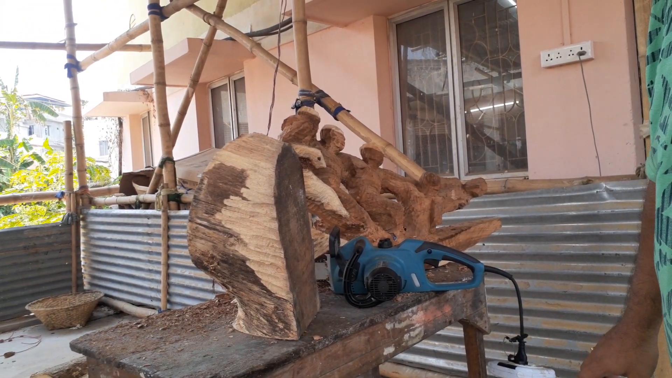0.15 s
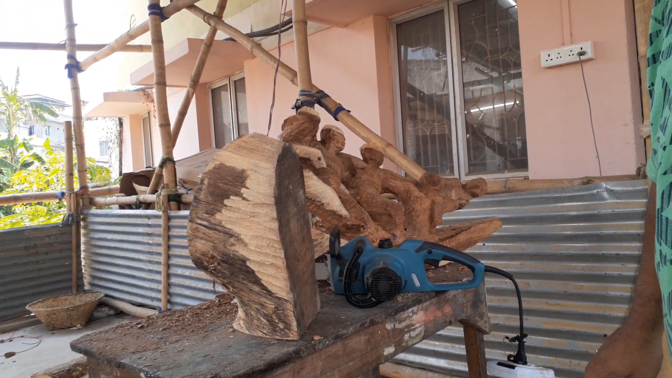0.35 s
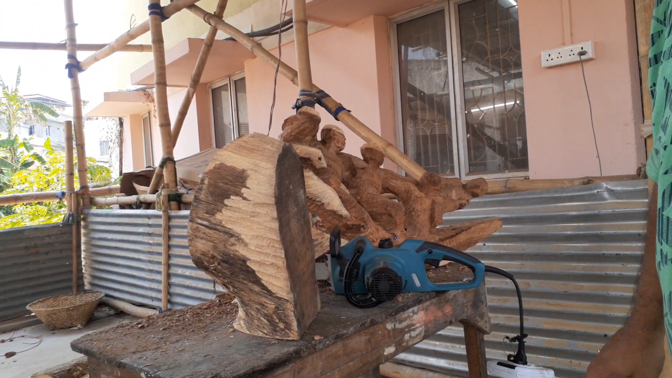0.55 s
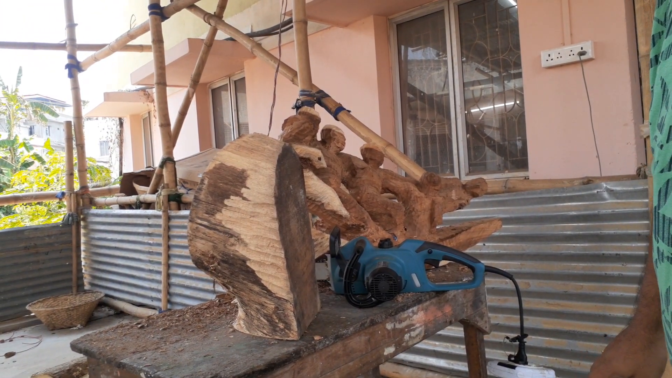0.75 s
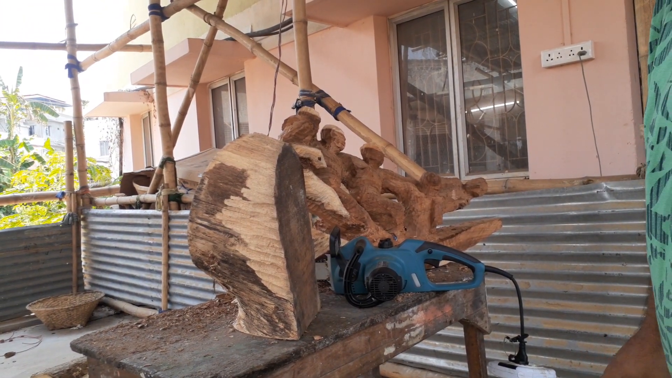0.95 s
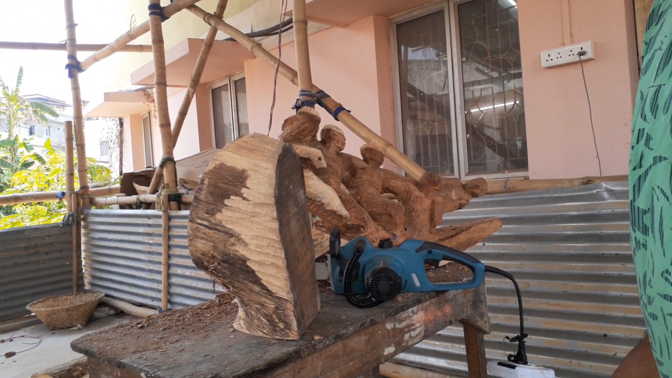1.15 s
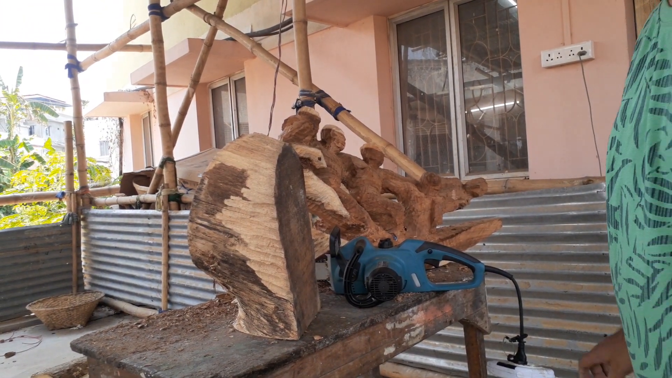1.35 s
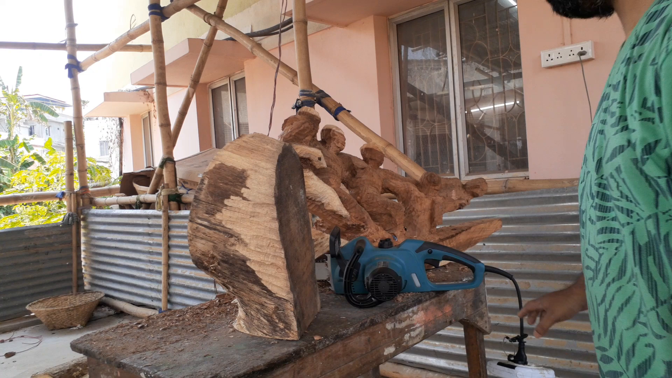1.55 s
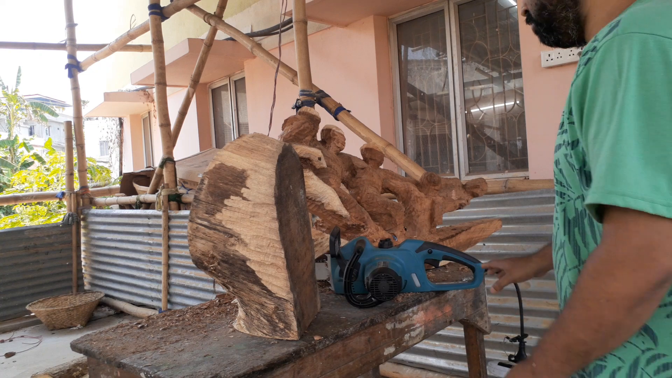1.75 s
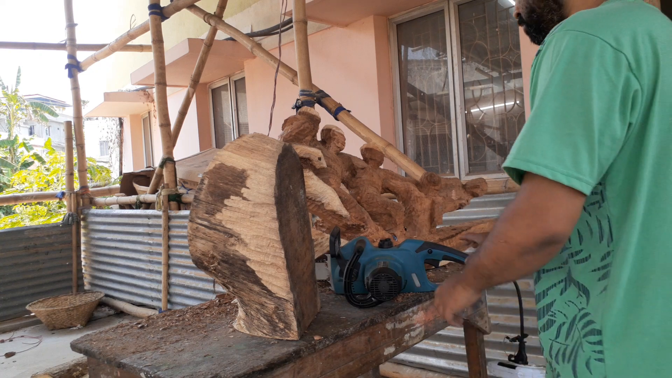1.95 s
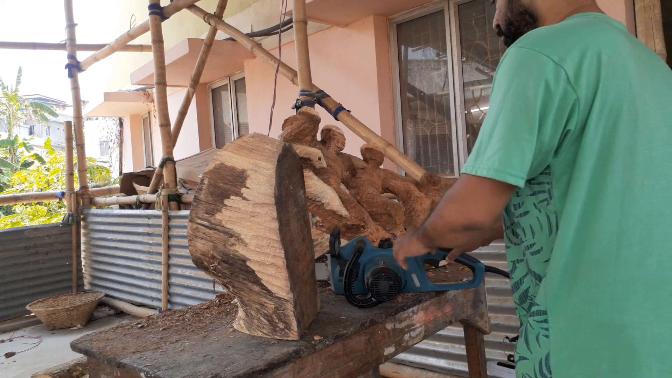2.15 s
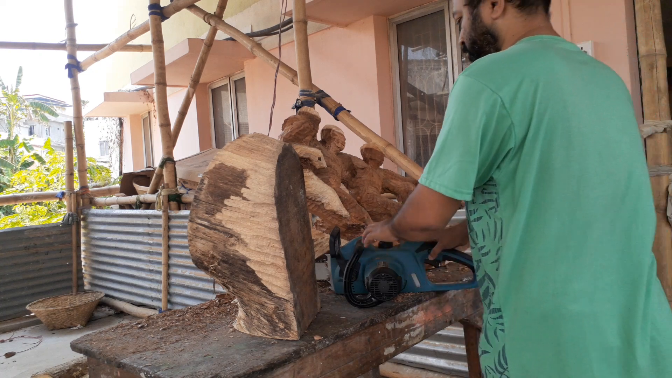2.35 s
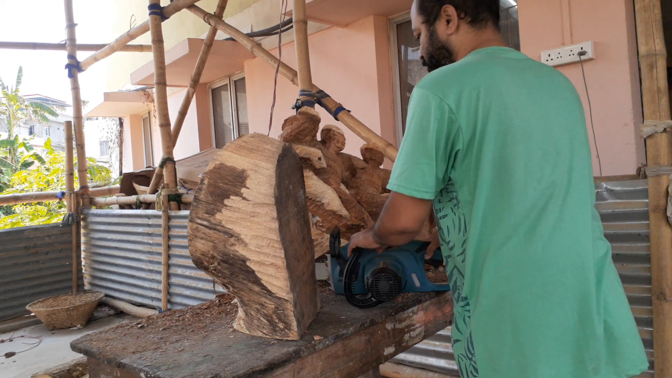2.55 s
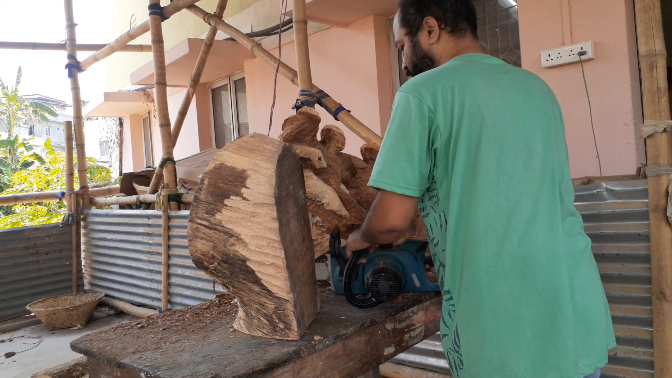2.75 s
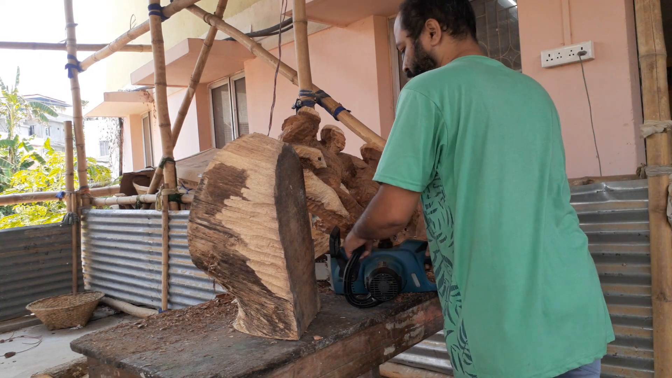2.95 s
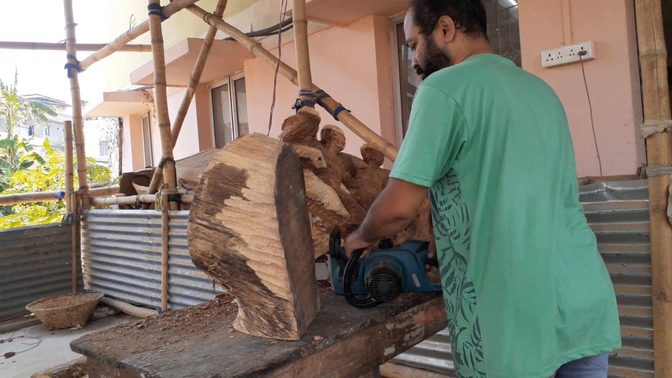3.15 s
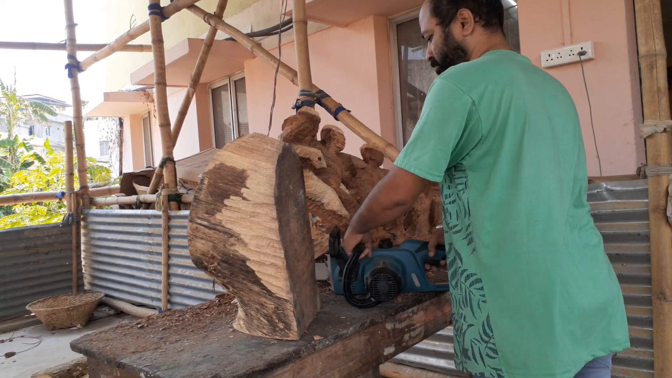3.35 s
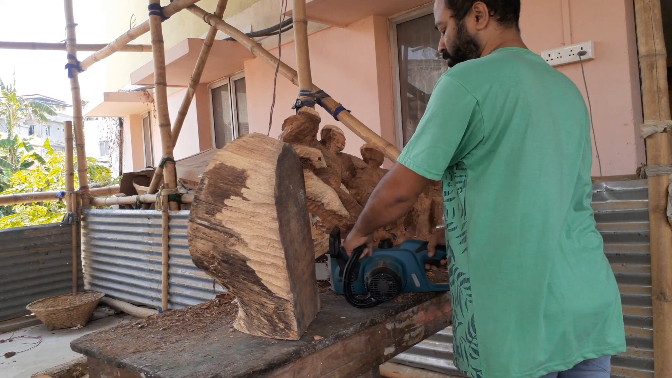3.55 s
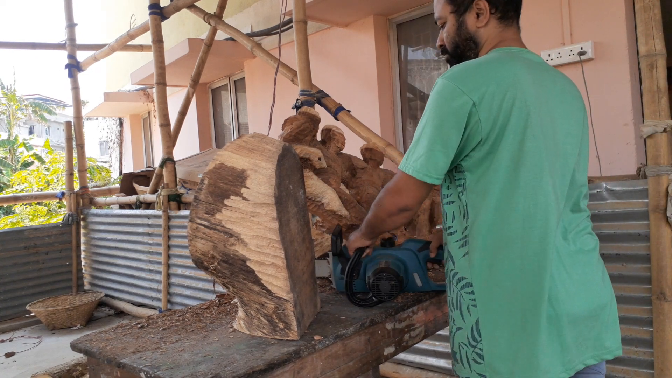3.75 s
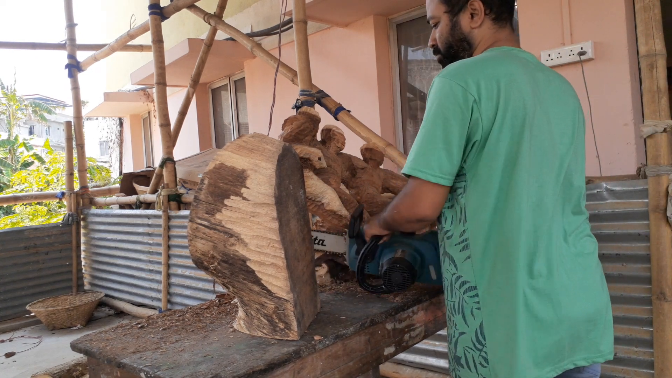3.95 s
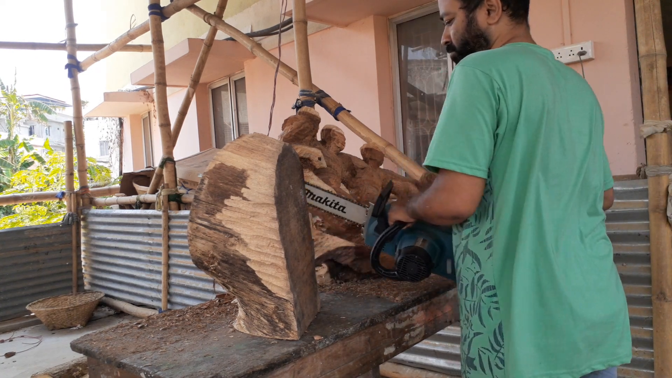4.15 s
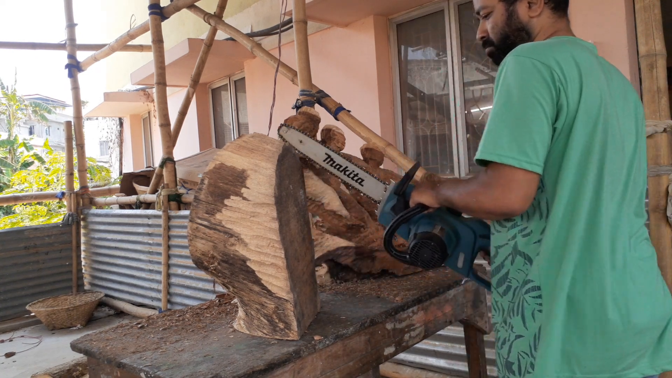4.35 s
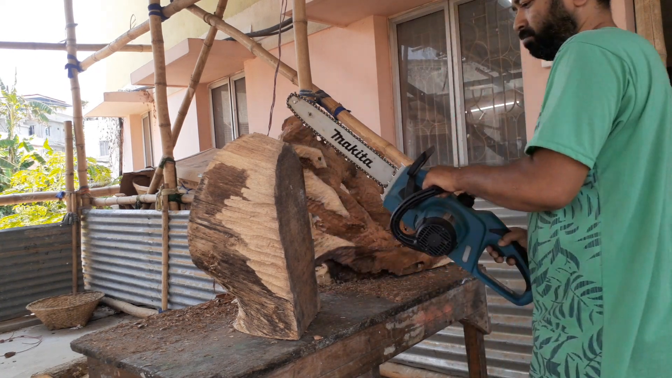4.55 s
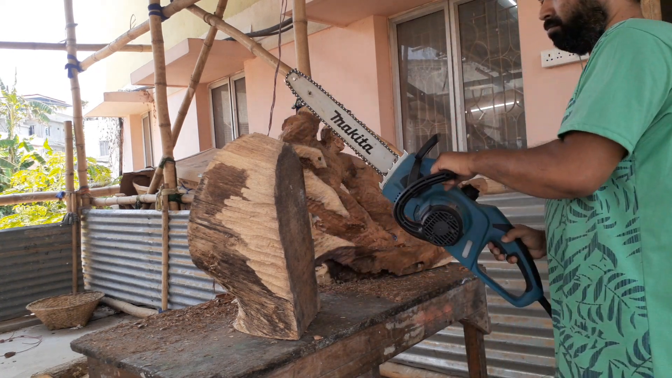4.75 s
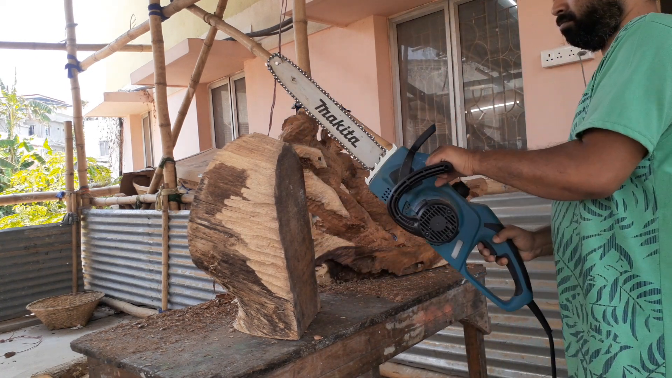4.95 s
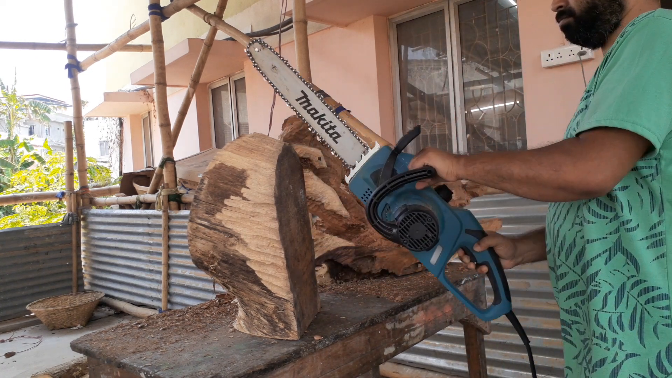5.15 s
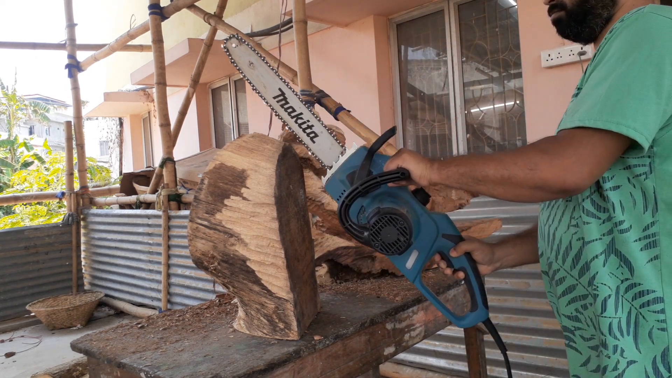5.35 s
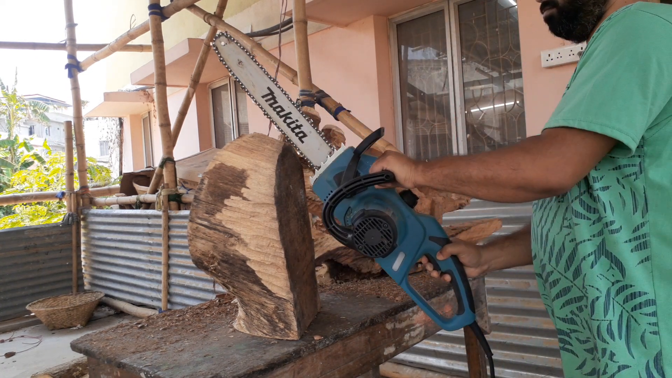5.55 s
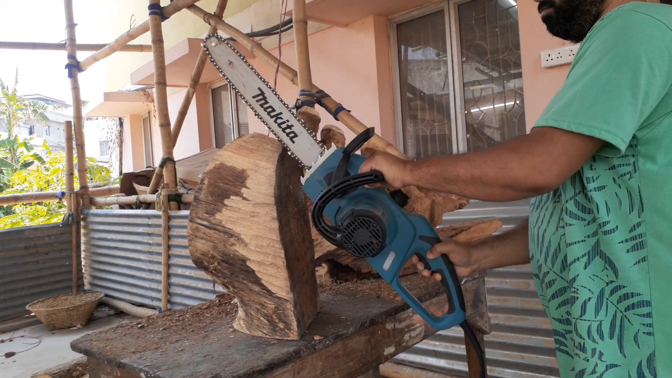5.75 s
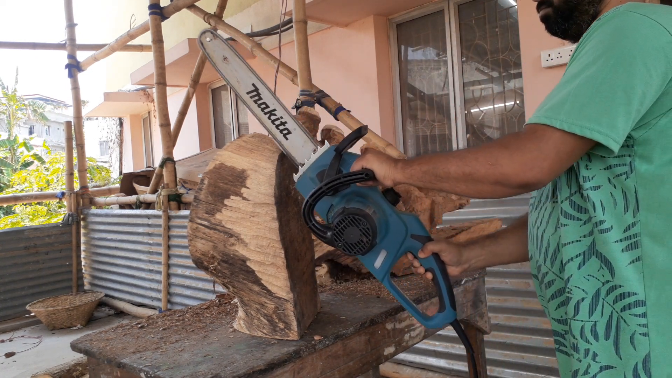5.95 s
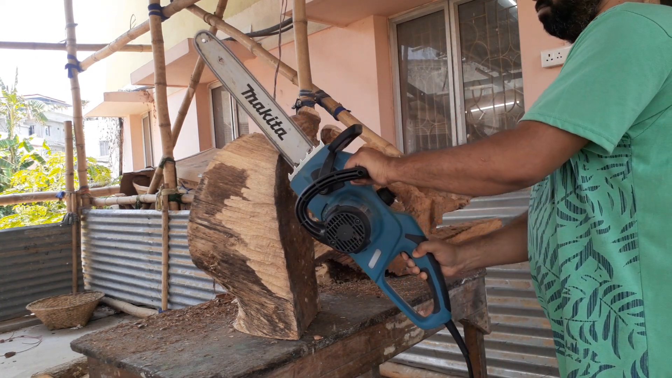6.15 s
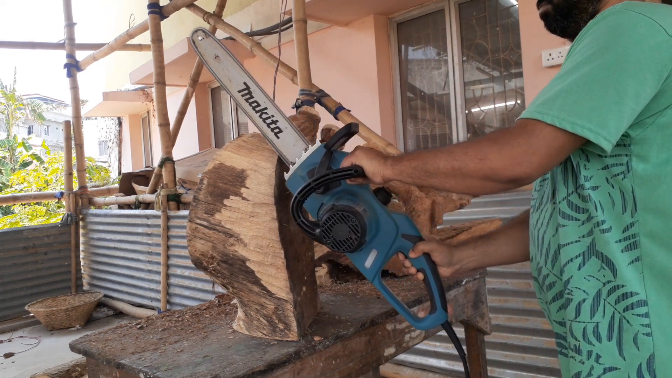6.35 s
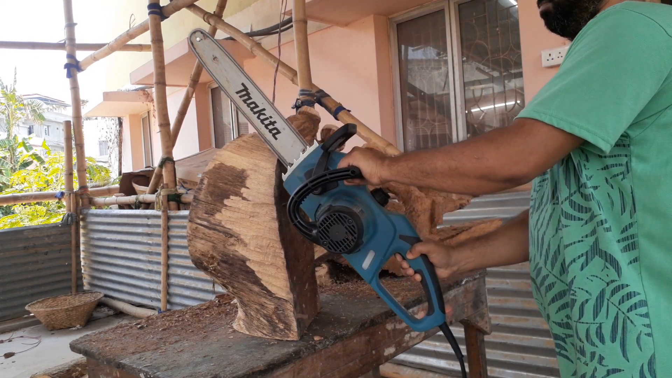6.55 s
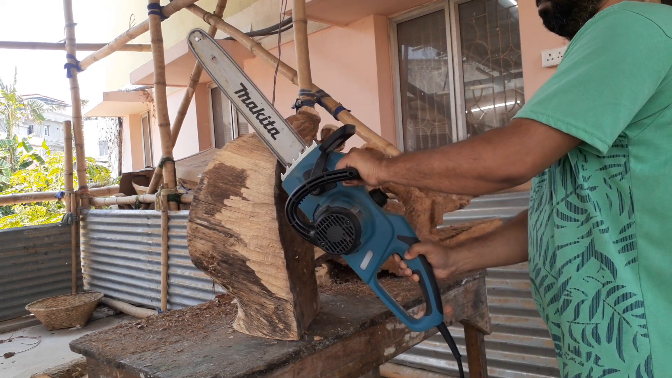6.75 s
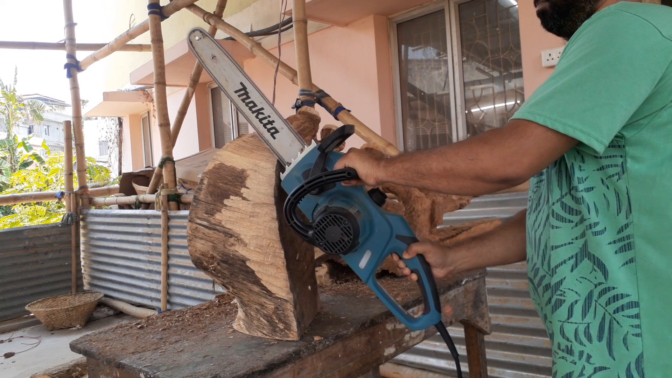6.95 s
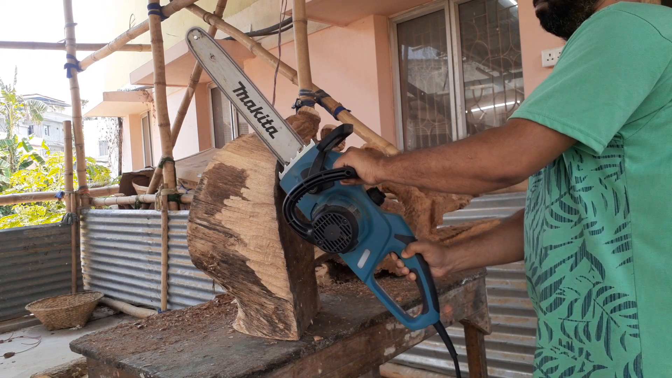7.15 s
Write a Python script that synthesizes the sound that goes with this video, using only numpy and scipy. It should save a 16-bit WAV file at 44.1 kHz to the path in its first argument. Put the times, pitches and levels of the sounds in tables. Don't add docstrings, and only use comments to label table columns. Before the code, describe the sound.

Stereo camera microphone in a quiet work yard: irregular woody-metallic chisel taps ring from a distance over soft hum and rumble. Nearby come a gritty footstep, a sharp knock, cloth rubs and light clicks. After almost six seconds a loud electric saw starts with a clattering kick, its gear whine climbing quickly to a steady high pitch amid rattling chain and airy fan noise; the automatic gain pulls down the background.

```python
import sys
import numpy as np
from scipy import signal
from scipy.fft import rfft, irfft, next_fast_len
from scipy.io import wavfile
from scipy.ndimage import map_coordinates

SR = 44100
rng = np.random.default_rng(int(sys.argv[2]) if len(sys.argv) > 2 else 0)


def wav_out(sig):
    wavfile.write(sys.argv[1], SR, np.round(np.clip(np.atleast_2d(sig).T, -1, 1) * 32767).astype(np.int16))


def level_to_linear(level):
    exponent = np.asarray(level, float) / 20
    return 10 ** exponent


N = 317961
SWITCH_ON_S = 5.9365
YARD_LAG = 14.12
# pitch_hz, likeness (1 = the same)
YARD_LIKENESS = [(60, .91), (300, .86), (1000, .7), (3000, .62), (8000, .3)]


def unit(x):
    return x / np.sqrt(np.mean(x ** 2) + 1e-20)


def along(points, hz):
    f, v = np.transpose(points)
    return np.interp(np.log(hz + 1), np.log(f + 1), v)


def curves(rows):
    s, *cols = np.transpose(rows)
    return [np.interp(np.arange(N) / SR, s, c) for c in cols]


def wobble(rate):
    at = np.arange(0, N + 32, 32)
    knots = rng.standard_normal(int(N * rate / SR) + 5)
    return np.interp(np.arange(N), at, map_coordinates(knots, [at * rate / SR]))


def filtered(x, response):
    n = x.shape[-1]
    m = next_fast_len(n + 8192)
    return irfft(rfft(x, m) * response(np.fft.rfftfreq(m, 1 / SR)), m)[..., :n]


def ports(lag, balance=((100, 0), (1000, 0))):
    side = np.array([[.5], [-.5]])
    return lambda hz: level_to_linear(side * along(balance, hz)) * np.exp(-2j * np.pi * hz * side * lag / SR)


def rush(spectrum, alike, heard, count=N):
    m = next_fast_len(count)
    hz = np.fft.rfftfreq(m, 1 / SR)
    turn = np.arccos(np.clip(along(alike, hz), -1, 1)) / 2
    coloured = rfft(rng.standard_normal((2, m))) * level_to_linear(along(spectrum, hz))
    mid, side = coloured * [np.cos(turn), np.sin(turn)]
    return unit(irfft(heard(hz) * [mid + side, mid - side], m)[:, :count])


def yard_noise(spectrum, count=N):
    return rush(spectrum, YARD_LIKENESS, ports(YARD_LAG), count)


def add(track, s, sound):
    part = track[:, round(s * SR):][:, :sound.shape[1]]
    part += sound[:, :part.shape[1]]


def strokes(rows):
    t = np.arange(0, N + 16, 16) / SR
    power = 0
    for s, hold, db, rise, fall in rows:
        before, after = np.maximum(s - t, 0), np.maximum(t - s - hold, 0)
        power = power + level_to_linear(db - rise * before - fall * after) ** 2
    return np.interp(np.arange(N) / SR, t, np.sqrt(power))


def yard():
    # pitch_hz, start_level_db, end_level_db
    pump = [(62, -56, -56), (123.5, -55, -56), (199.5, -55, -52), (280, -62, -60), (302, -60, -52),
            (326.3, -53, -48), (349.9, -46, -47.5), (373.5, -59, -59), (443, -57, -58)]
    # pitch_hz, density_db (per Hz)
    rumble_colour = [(15, -56), (25, -33), (45, -7), (65, 7), (123, 5), (167, 0.5), (200, -2), (260, -38),
                     (340, -16), (570, -120)]
    air_colour = [(120, -16), (200, -15), (350, -7), (500, -12), (750, -13.5), (1100, -15.5), (1600, -13.5),
                  (2500, -22), (3500, -27.5), (4700, -27), (6000, -37.5), (8500, -40.5), (11000, -40.5),
                  (15800, -49)]
    # start_s, hold_s, level_db, rise_db_per_s, fall_db_per_s
    traffic = [
        (.22, .05, -55, 20, 45),
        (.69, .3, -54, 33, 20),
        (1.4, .05, -51, 40, 29),
        (3.02, 0.088, -49, 12, 12),
        (4.0, .35, -48.5, 12, 27),
        (4.84, .01, -52, 230, 140),
        (5.81, .02, -41, 60, 120),
    ]
    air_swells = [
        (.01, 0.11, -43.5, 50, 42),
        (1.4, .02, -39.5, 70, 34),
        (2.5, .6, -46, 30, 12),
        (4.38, 0.072, -45, 29.8, 30),
        (5.65, 0.028, -48, 40, 52),
    ]
    rumble_db, air_db = -49.5, -44.5
    t = np.arange(N) / SR
    hum = np.zeros(N)
    for hz, start_db, end_db in pump:
        level = level_to_linear(np.linspace(start_db, end_db, N) + 4 + 1.0 * wobble(3))
        hum += level * np.sin(2 * np.pi * (hz * t + .04 * wobble(3)))
    rumble_gain = np.hypot(level_to_linear(rumble_db), strokes(traffic)) * level_to_linear(0.28 * wobble(4.5))
    rumble = rumble_gain * yard_noise(rumble_colour)
    air_gain = np.hypot(level_to_linear(air_db), strokes(air_swells)) * level_to_linear(2 + .5 * wobble(8))
    air = air_gain * yard_noise(air_colour)
    leaning_left = level_to_linear([[.4], [-.4]])
    return leaning_left * (rumble + filtered(hum, ports(YARD_LAG))) + air


def scuffs():
    # pitch_hz, density_db (per Hz)
    chip_colour = [(180, -35), (300, -13), (425, -0.5), (546, -9), (885, -0.5), (1560, 1), (1690, 1.5),
                   (1840, -3), (3400, -11.5), (3830, -7), (4520, -10), (11900, -22.5), (16000, -28)]
    cloth_colour = [(880, -42), (1500, 0), (2230, -4), (2770, -9), (5380, -9.5), (7320, -16), (10800, -17),
                    (16000, -23)]
    # start_s, hold_s, level_db, rise_db_per_s, fall_db_per_s
    footstep = [
        (1.309, .01, -26, 3000, 300),
        (1.325, .023, -22, 900, 135),
        (1.436, .005, -25.5, 250, 150),
        (1.4, .1, -40, 900, 60),
    ]
    handling = [
        (.102, .005, -49, 400, 185),
        (.03, 0.29, -62, 300, 90),
        (2.27, 0.21, -52.5, 900, 90),
        (2.592, 0.045, -45, 110, 80),
        (2.794, .003, -42.5, 900, 400),
        (2.84, .17, -41.5, 500, 90),
        (3.028, 0.018, -48, 700, 148.4),
    ]
    bright_db, dulls_db_per_s, dullest_db = -5, 137, -25
    since_heel = np.arange(N) / SR - footstep[0][0]
    crackle_db = np.clip(bright_db - dulls_db_per_s * since_heel, dullest_db, bright_db)
    chips = yard_noise(chip_colour) * level_to_linear(1.1 * wobble(300))
    sliding = filtered(chips, lambda hz: 1 / (1 + (hz / 5000) ** 4))
    foot = strokes(footstep) * (unit(sliding) + level_to_linear(crackle_db) * unit(chips - sliding))
    cloth = yard_noise(cloth_colour) * level_to_linear(2.5 * wobble(700) + .7 * wobble(40))
    return foot + cloth * level_to_linear(2.5) * strokes(handling)


def ticks():
    # start_s, peak_db, centre_hz, left_minus_right_db, t60_s (time to fall 60 dB)
    clicks = [(.1, -52, 9000, 0, .1), (.36, -60, 9000, 0, .05), (1.54, -56, 9000, 3, .04),
              (1.74, -54, 9000, 0, .06), (2.276, -32, 1700, -2, .04), (2.278, -44, 5200, -2, .04),
              (2.3105, -23, 1620, 0, .06), (2.3, -55, 13000, 0, .04), (3.603, -41, 8000, 3, .02),
              (3.603, -35, 3800, 3, .02), (3.62, -52, 5000, 0, .04), (3.737, -51, 3200, 0, .04),
              (4.2, -59, 8000, 0, .06), (4.54, -57, 6500, 0, .04), (4.565, -54, 8000, 0, .04),
              (5.045, -38, 2600, 0, .03), (5.046, -52, 8000, 0, .025), (5.053, -52, 8000, 0, .04),
              (5.08, -52, 5000, 0, .05), (5.2, -56, 6500, 0, .04)]
    out, t = np.zeros((2, N)), np.arange(SR // 12) / SR
    for s, db, hz, pan_db, t60 in clicks:
        colour = [(hz * .1, -60), (hz * .3, -28), (hz * .7, -7), (hz, 0),
                  (hz * 1.4, -8), (hz * 3.5, -30), (hz * 9, -60)]
        click = rush(colour, YARD_LIKENESS, ports(YARD_LAG, [(100, pan_db)]), count=len(t))
        fade = level_to_linear(-60 * t / t60) + .1 * level_to_linear(-60 * t / .2)
        add(out, s, level_to_linear(db + 4) * click * np.minimum(t / .0006, 1) * fade)
    return out


def whistles():
    # start_s, length_s, start_hz, end_hz, level_db
    bird = [
        (.155, .02, 4600, 3700, -49),
        (4.893, .02, 5600, 4200, -49),
        (4.965, .012, 4500, 3800, -47),
        (4.98, .02, 3800, 4200, -55),
    ]
    vehicle = [
        (0.201, 0.805, 700, 615, -54),
    ]
    # start_s, length_s, pitch_hz, level_db
    steel = [
        (2.39, .14, 5900, -58),
        (2.4, .09, 6400, -60),
        (2.525, .04, 5900, -54),
        (2.58, .1, 5900, -57),
        (2.59, .08, 6400, -56),
    ]
    glides = bird + vehicle + [(s, length, hz, hz, db) for s, length, hz, db in steel]
    out = np.zeros((2, N))
    for s, length, start_hz, end_hz, db in glides:
        hz = np.linspace(start_hz, end_hz, round(length * SR))
        tone = np.hanning(len(hz)) * np.sin(2 * np.pi * np.cumsum(hz) / SR)
        add(out, s, level_to_linear(db) * tone * level_to_linear([[2.5], [-2.5]]))
    return out


def mallet():
    # start_s, chisel_db, log_db over the chisel, handle_db over the chisel
    taps = [(0.9307, -24.5, -9, 3.5), (1.1757, -22, -7.5, 1.5), (1.675, -24.5, -12, -3.5),
            (2.3205, -25.5, -15, 1.5), (2.5551, -20.5, -11.5, -3.5), (2.7924, -26.5, -8, 2),
            (3.0289, -19, -11, -2), (3.2917, -21, -12, -2), (3.895, -22, -13, 1), (4.1333, -21, -10.5, 1.5),
            (4.3817, -19.5, -11, -0.5), (5.3252, -28.5, -13, 0.5), (5.5662, -22.5, -9.5, -2),
            (5.828, -22, -11, -3)]
    # pitch_hz, width_hz, level_db
    chisel = [(490, 40, -6), (610, 60, -1), (812, 65, 1), (1425, 80, -3), (1830, 90, -6), (2180, 100, -5),
              (2550, 120, -6), (2760, 150, -2), (3230, 100, -9), (4300, 150, -10), (4700, 220, -4)]
    # pitch_hz, density_db (per Hz)
    blow_colour = [(300, -8), (500, -2.5), (1000, 1), (3000, -11.5), (5200, -9.5), (6500, -19.5),
                   (10000, -23.5), (16000, -28)]
    # pitch_hz, t60_s
    walls = [(400, 0.49), (1000, 0.69), (2800, 0.58), (7000, 0.36), (14000, 0.43)]
    # pitch_hz, level_db, t60_s
    straight = [(645, -4.5, 0.2), (2040, -5, 0.067), (2770, -15, 0.018)]
    bench_db, steel_db = -31, -4.5
    out, t = np.zeros((2, N)), np.arange(SR * 3 // 5) / SR
    for s, db, log_db, handle_db in taps:
        detune = 1 + [.008, 0, 0] * rng.standard_normal((len(chisel), 3))
        modes = chisel * detune + [0, 0, 1.5] * rng.standard_normal((len(chisel), 3))
        tilt = [(600, log_db + 2.5), (830, bench_db - db), (1800, handle_db), (2800, 0), (4700, steel_db)]

        def body(f):
            power = sum(abs(level_to_linear(g) * f * w / (c * c - f * f + 1j * f * w)) ** 2 for c, w, g in modes)
            return (.11 + np.sqrt(power)) * level_to_linear(along(tilt, f))

        noise = filtered(yard_noise(blow_colour, len(t)), body)
        bands_hz, when, z = signal.stft(noise, SR, nperseg=256)
        fading = z * level_to_linear(-60 * when / along(walls, bands_hz)[:, None])
        tail = signal.istft(fading, SR, nperseg=256)[1][:, :len(t)]
        early = level_to_linear(-60 * t / 0.0092) + 0.47 * level_to_linear(-60 * abs(t - .013) / 0.015)
        first = np.zeros(len(t))
        for hz, level, t60 in straight:
            first += level_to_linear(level + along(tilt, hz) - 60 * t / t60) * np.sin(2 * np.pi * hz * t)
        echo = level_to_linear(db + 5.0) * tail * (1 + early) * np.minimum(t * 2600, 1)
        add(out, s, echo + level_to_linear(db) * filtered(first, ports(YARD_LAG)))
    return out


def saw():
    # turns_multiple (of shaft speed), level_db, unsteadiness_db
    gear_tones = [(1.65, -43, 1.5), (2, -47, 2), (2.5, -45, 2), (3.3, -45, 2), (4, -37, 1.0),
                  (8, -40.5, 1.5), (10, -49, 2), (12, -47, 2), (34, -37.5, 1.8), (38, -41, 2)]
    # pitch_hz, density_db (per Hz)
    growl_colour = [(120, -40), (210, -17), (340, -2), (520, -10), (800, -4), (1000, -4), (1200, 1),
                    (1430, 0), (1700, -8), (2500, -15), (4000, -40)]
    rattle_colour = [(350, -24.5), (600, -9), (999, -4), (1440, -4.5), (1630, -5.5), (1790, -1.5),
                     (2130, -3), (2900, -.5), (3710, -2), (5720, -5.5), (6870, -10.5), (8000, -9.5),
                     (10400, -14.5), (17600, -120)]
    fan_colour = [(3240, -47), (5500, 1), (7000, -14), (8520, 2), (10100, 3.5), (12200, 9), (14400, 6),
                  (15200, 10.5), (16000, -18)]
    # pitch_hz, left_minus_right_db
    balance = [(60, 2), (110, 8), (200, 3), (380, 0), (700, 3), (1290, 0), (2380, 2), (4400, -1.5),
               (8120, 9.5), (15000, 7)]
    # pitch_hz, likeness
    likeness = [(100, 0.25), (300, 0.87), (1500, 0.82), (4000, 0.91), (8000, 0.22), (15000, 0.25)]
    # start_s, peak_db, ring_hz
    jolts = [(5.937, -26, 1410), (5.948, -19.5, 321), (5.944, -20, 3770), (5.956, -15, 1390),
             (5.97, -9, 5950), (5.969, -14, 5240), (5.972, -18, 1210), (5.984, -20, 1000),
             (6.004, -19, 1270), (6.01, -19, 980), (6.046, -20, 1230)]
    # time_s, missing_turns_per_s
    spin_up = [
        (5.94, 343),
        (6.13, 96),
        (6.3, 46.5),
        (6.5, 17.3),
        (6.7, 4.8),
        (6.8, 2.3),
        (7.21, .2),
    ]
    # time_s, level_db
    saw_level = [
        (5.94, -19),
        (5.978, -20.5),
        (6.07, -19),
        (6.286, -19.5),
        (6.314, -23.5),
        (6.356, -19),
        (6.424, -21.5),
        (7.21, -21.5),
    ]
    full_speed = 463
    growl_over_db, kick_db = -11, 11.5
    kick_s, kick_hold_s, kick_rise_s, kick_fall_s = 0.044, 0.034, 0.063, .09
    fan_over_db, fan_lag_db = 1.3, -5
    puff_db, puff_s = -25, 0.011
    strain_max_db = 20
    mesh_s = .04
    on = round(SWITCH_ON_S * SR)
    running = np.arange(N - on) / SR
    heard = ports(-2.1, balance)

    def shake(rate):
        return wobble(rate)[on:]

    def noise(colour):
        return rush(colour, likeness, heard, count=N - on)

    log_gap = curves([(s, np.log(gap)) for s, gap in spin_up])[0][on:]
    speed = full_speed - np.exp(log_gap)
    turns = np.cumsum(speed) / SR
    slowness = 1 - speed / full_speed

    rattle_db = curves(saw_level)[0][on:]
    kick_rise = (kick_s - running) / kick_rise_s
    kick_fall = np.maximum(running - kick_s - kick_hold_s, 0) / kick_fall_s
    kick = np.exp(-np.maximum(kick_rise, kick_fall))
    growl_db = rattle_db + growl_over_db + kick_db * kick
    fan_db = rattle_db + fan_over_db + fan_lag_db * slowness + puff_db * np.exp(-running / puff_s)

    strain_db = strain_max_db * slowness
    tones = np.zeros(N - on)
    for k, db, shake_db in gear_tones:
        bite_db = strain_db * min(k / 8, 1) ** 3 * (1 - (k / 18) ** 2)
        level = level_to_linear(db + 1 + bite_db + (shake_db + .25 * strain_db) * shake(18))
        tones += level * np.sin(2 * np.pi * (k * turns + .035 * shake(30)))

    links = 1 + 0.25 * np.cos(2 * np.pi * gear_tones[0][0] * turns)
    growl = level_to_linear(growl_db + (.8 + 1.2 * kick) * shake(60)) * noise(growl_colour)
    rattle = level_to_linear(rattle_db + .4 * shake(50)) * links * noise(rattle_colour)
    fan = level_to_linear(fan_db + .3 * shake(25)) * noise(fan_colour)

    casing_db = np.linspace(1.5, .4, 300) * rng.standard_normal(300)
    body = filtered(growl + rattle + fan, lambda hz: level_to_linear(np.interp(hz / 60, np.arange(300), casing_db)))
    meshed = tones * (1 - np.exp(-running / mesh_s))
    motor = body + np.sqrt(2) * filtered(meshed, heard)

    out, t = np.zeros((2, N)), np.arange(SR // 20) / SR
    add(out, SWITCH_ON_S, motor * np.minimum(running / .0015, 1))
    for s, db, hz in jolts:
        ring = level_to_linear(db - 60 * t / (0.02 + 25 / hz)) * np.sin(2 * np.pi * hz * t)
        add(out, s, filtered(ring, heard))
    return out


def scene():
    yard_db, duck_db, duck_s = 2.5, -16.5, 0.23
    running = np.maximum(np.arange(N) / SR - SWITCH_ON_S, 0)
    gain_db = yard_db + duck_db * (1 - np.exp(-(running / duck_s) ** 2))
    return level_to_linear(gain_db) * (yard() + scuffs() + ticks() + whistles() + mallet()) + saw()


def band_limit(x):
    return signal.sosfilt(signal.butter(12, 17070, fs=SR, output="sos"), x)


def record(dry):
    peak, top_hz, bass_hz = .95, 15780, 36

    def band(hz):
        return 1 / (1 + (hz / top_hz) ** 600) * hz ** 4 / (hz ** 4 + bass_hz ** 4)

    limited = peak * np.tanh(dry / peak)
    return band_limit(filtered(limited, band))


dry = scene()
out = record(dry)
wav_out(out)
```